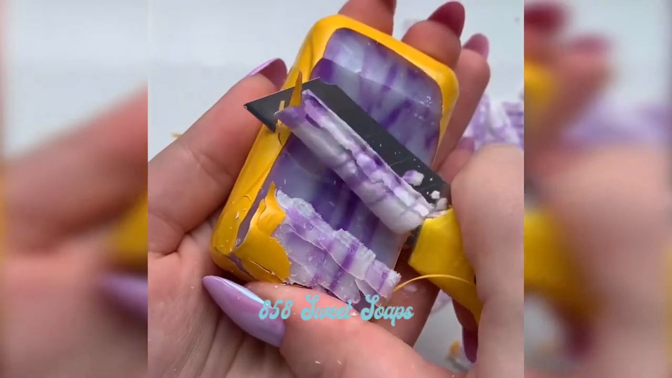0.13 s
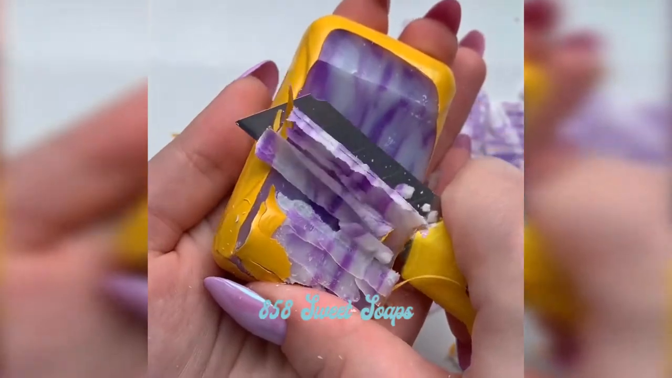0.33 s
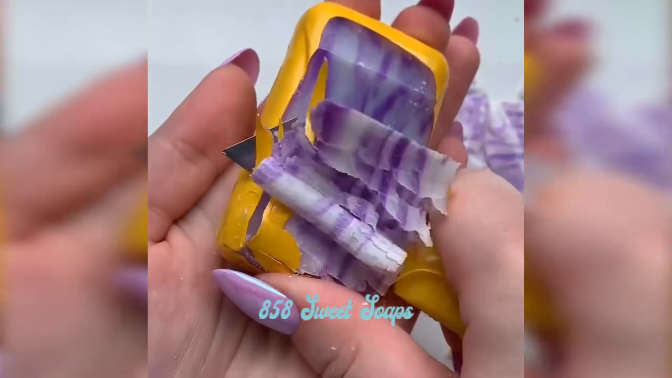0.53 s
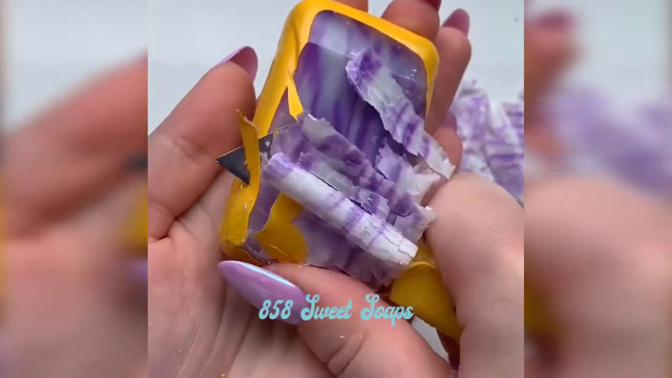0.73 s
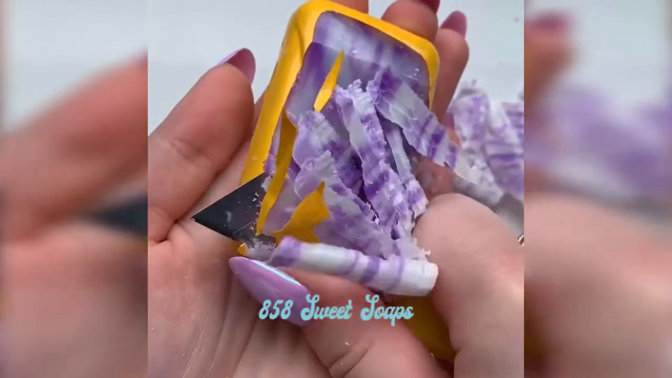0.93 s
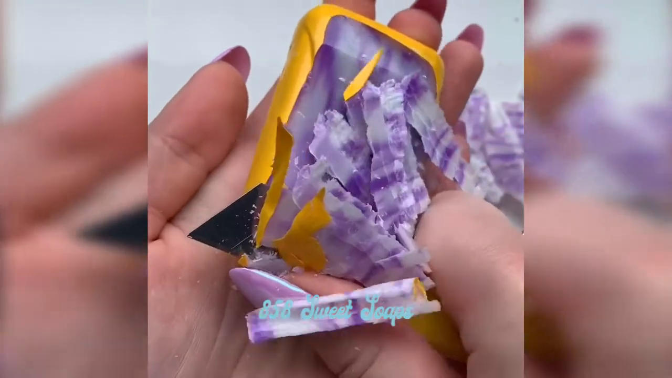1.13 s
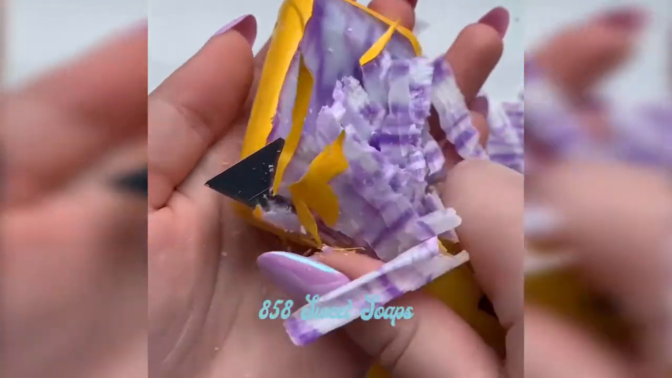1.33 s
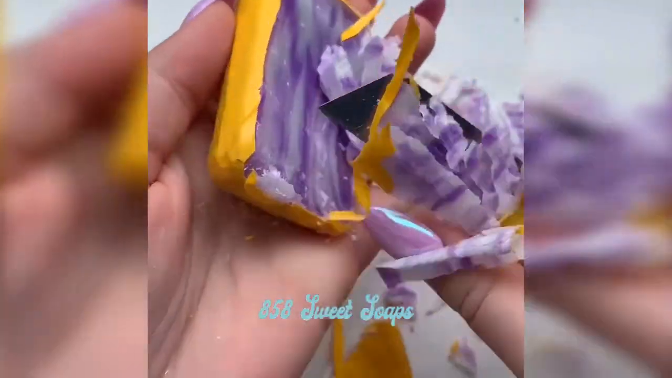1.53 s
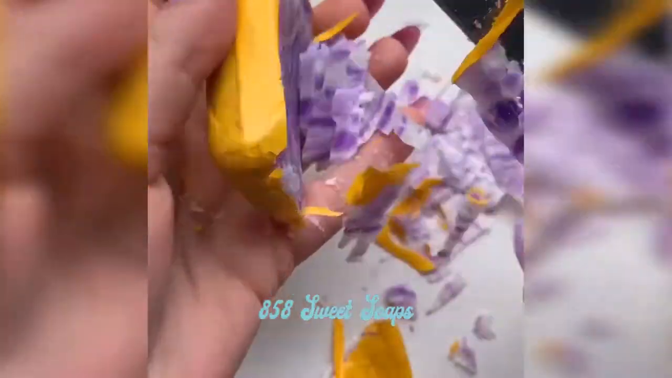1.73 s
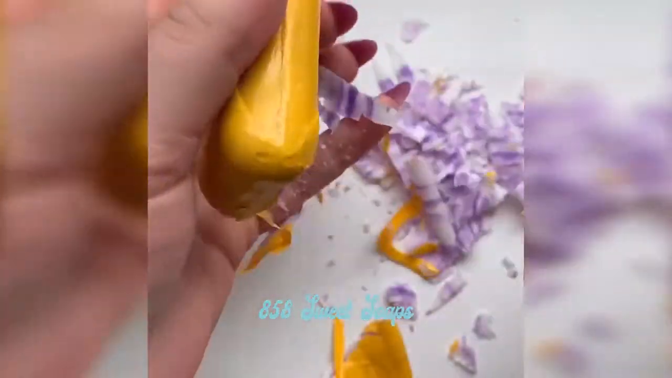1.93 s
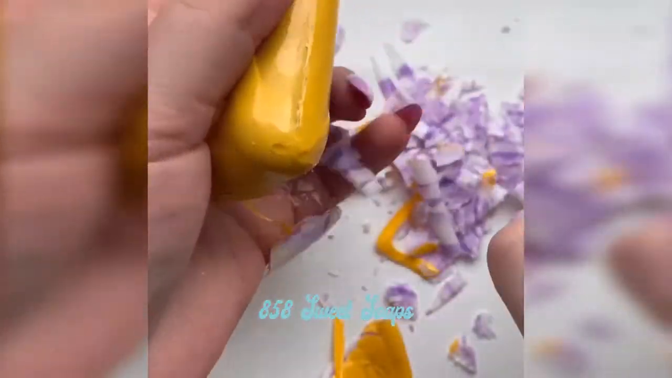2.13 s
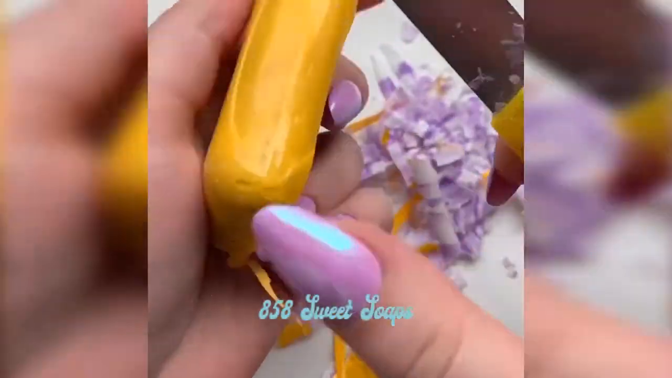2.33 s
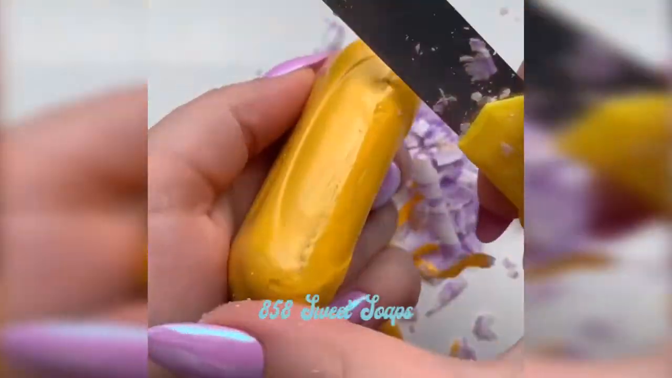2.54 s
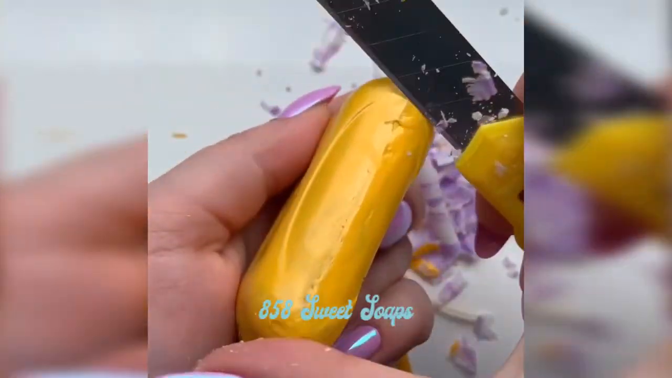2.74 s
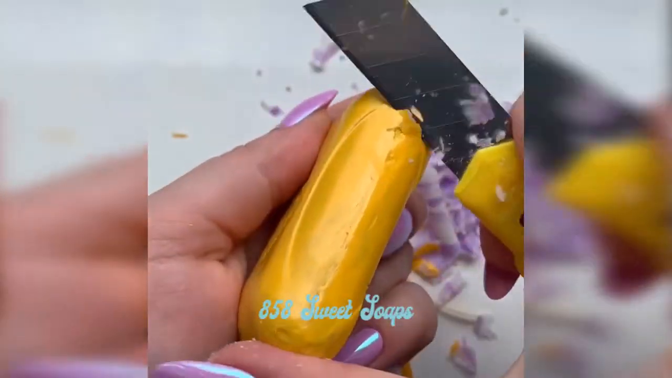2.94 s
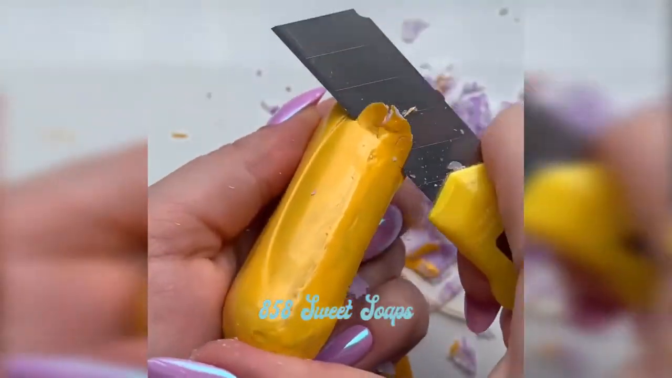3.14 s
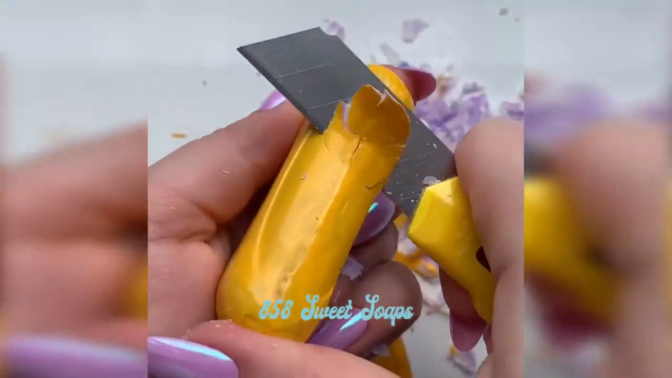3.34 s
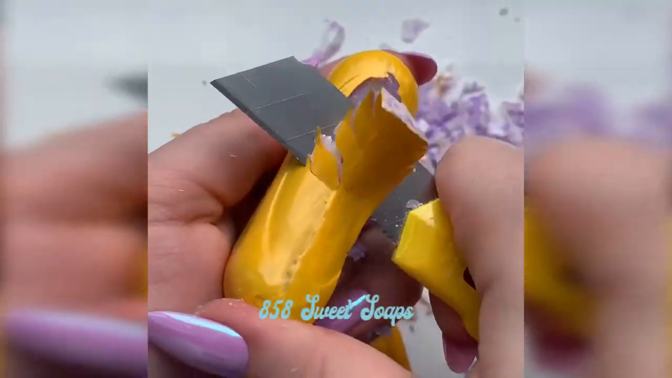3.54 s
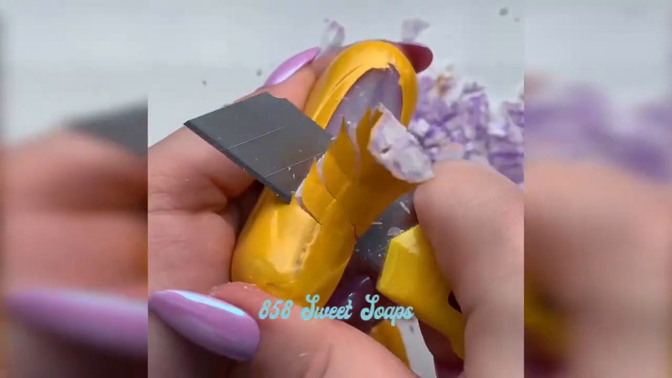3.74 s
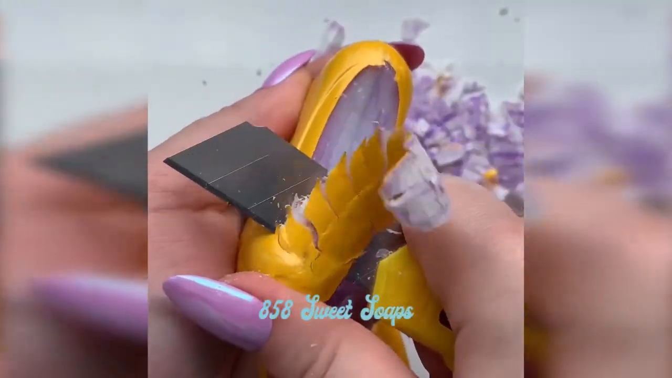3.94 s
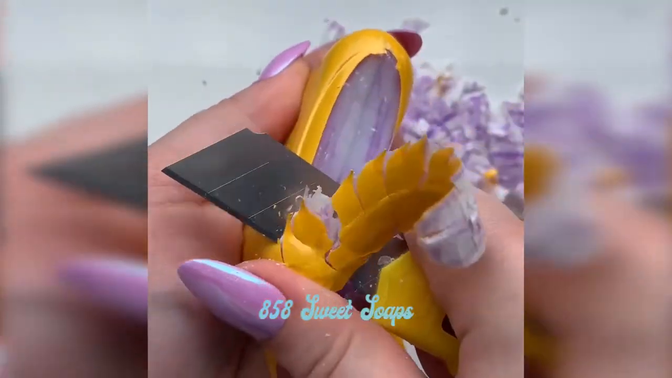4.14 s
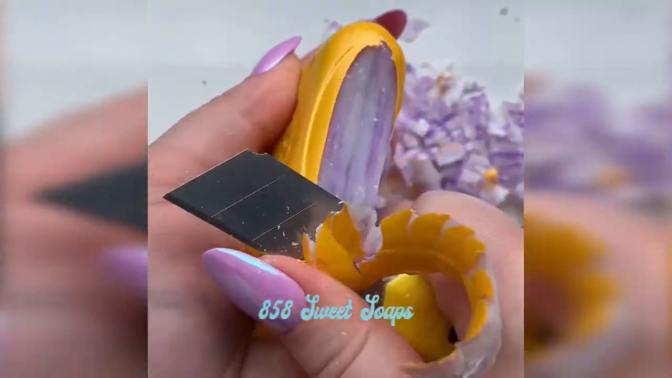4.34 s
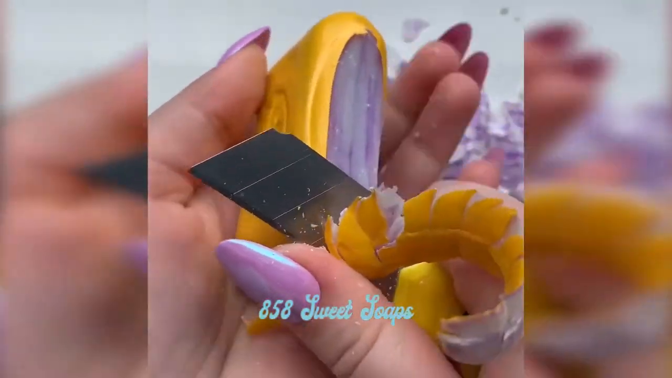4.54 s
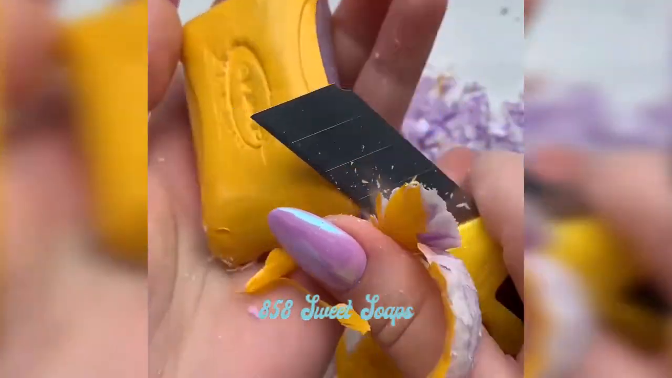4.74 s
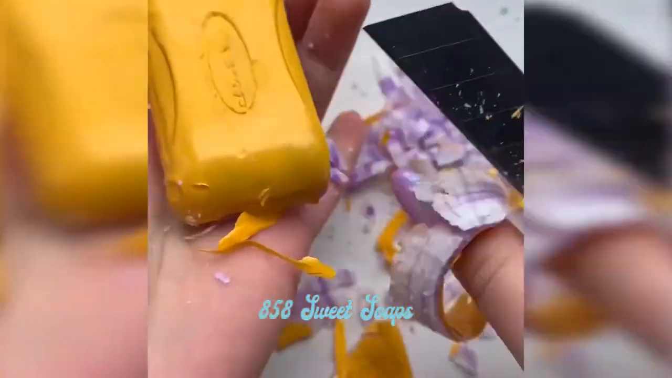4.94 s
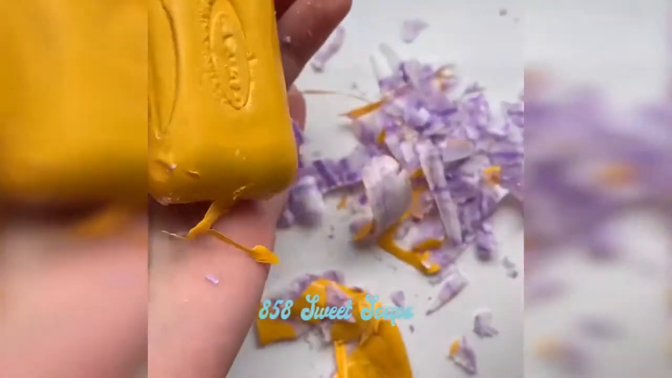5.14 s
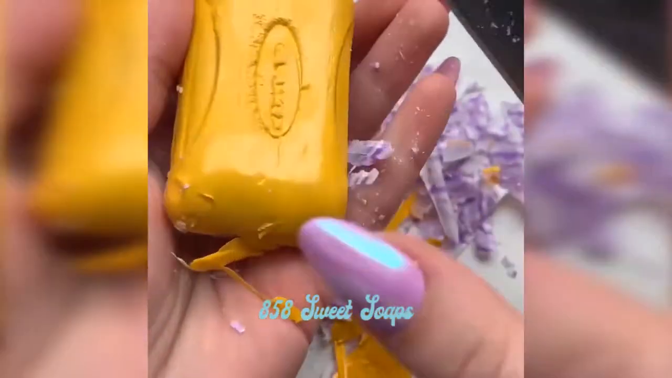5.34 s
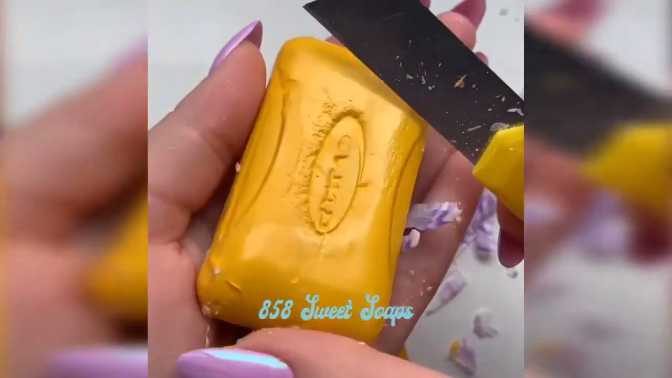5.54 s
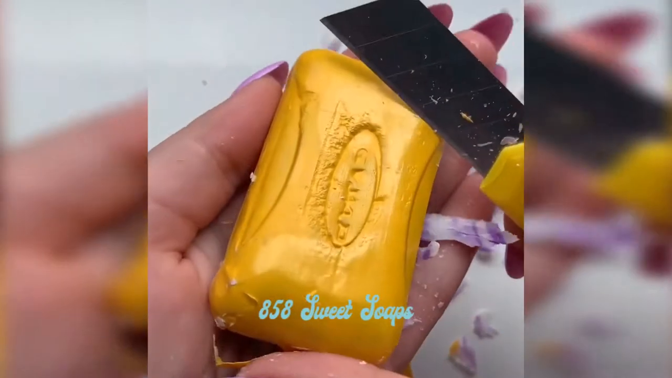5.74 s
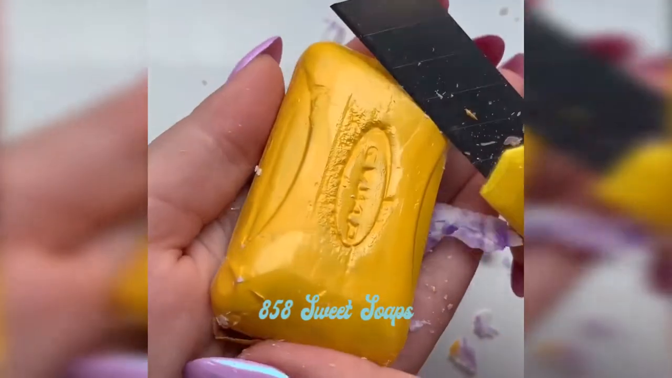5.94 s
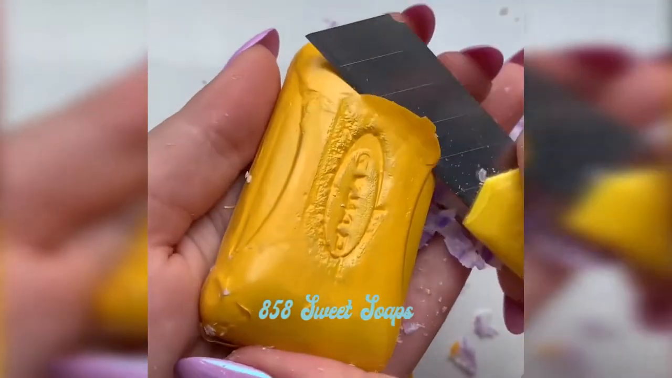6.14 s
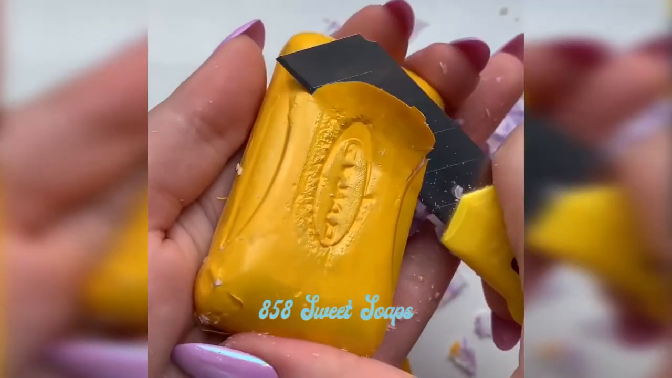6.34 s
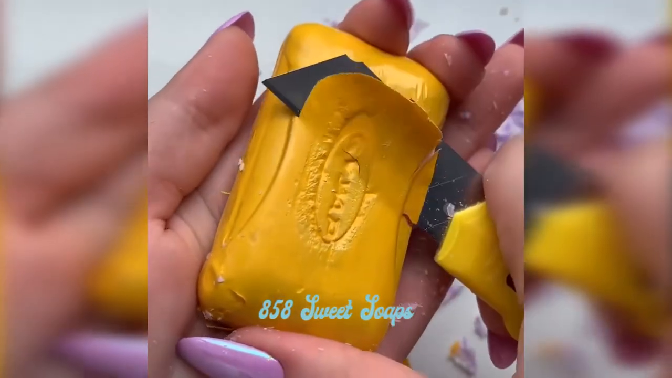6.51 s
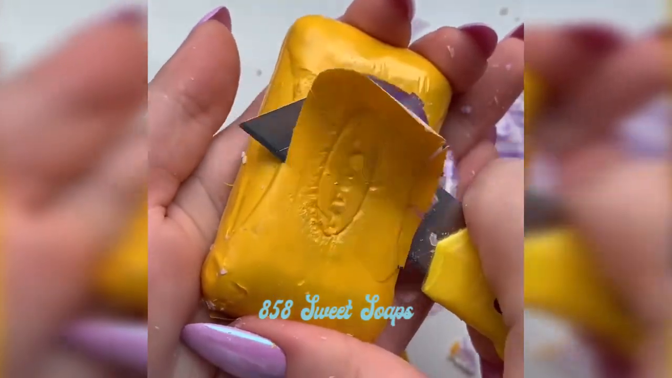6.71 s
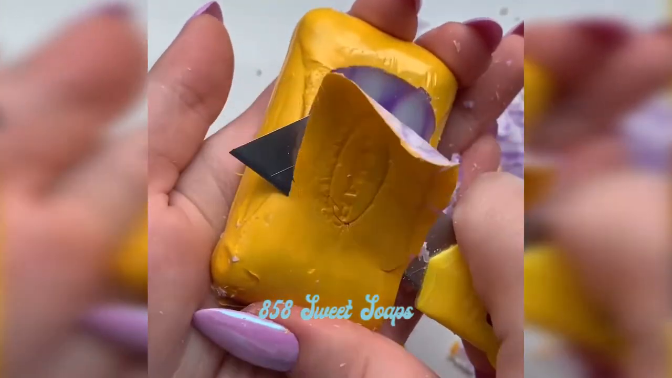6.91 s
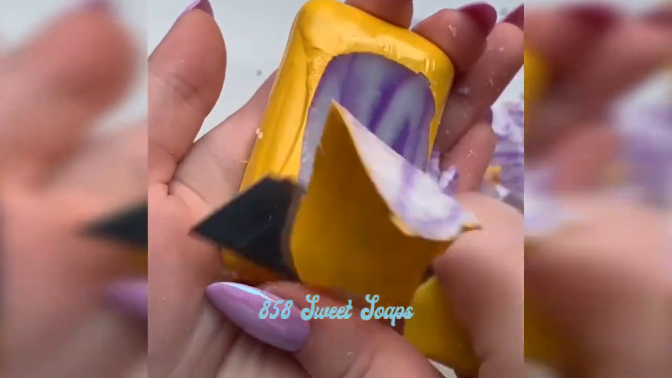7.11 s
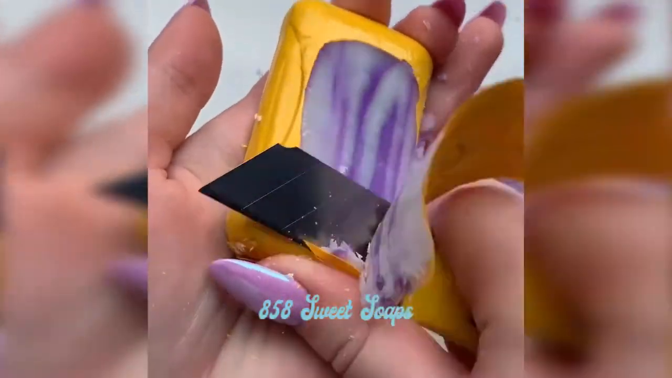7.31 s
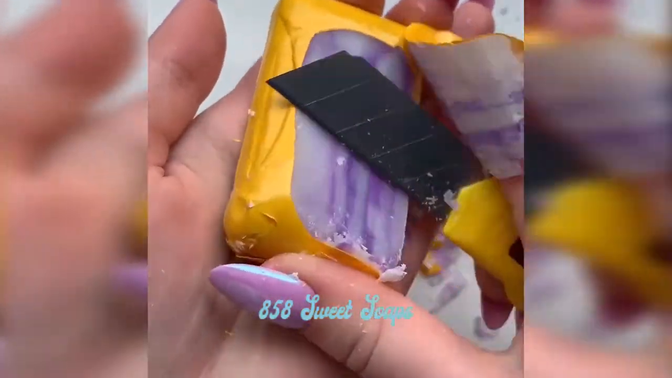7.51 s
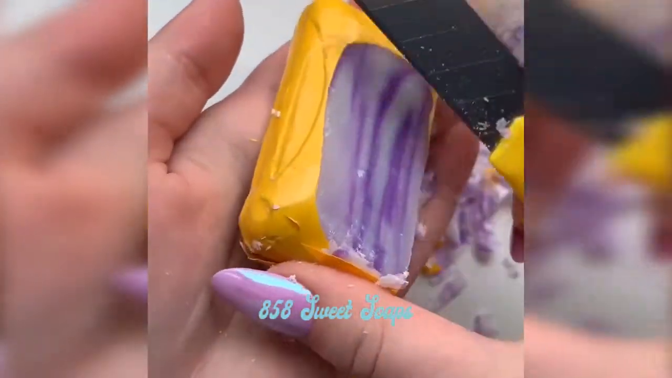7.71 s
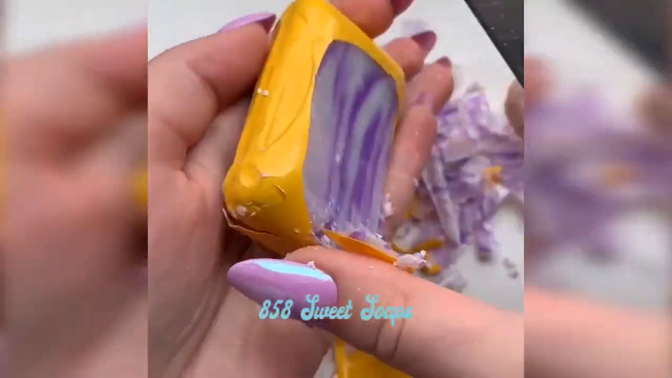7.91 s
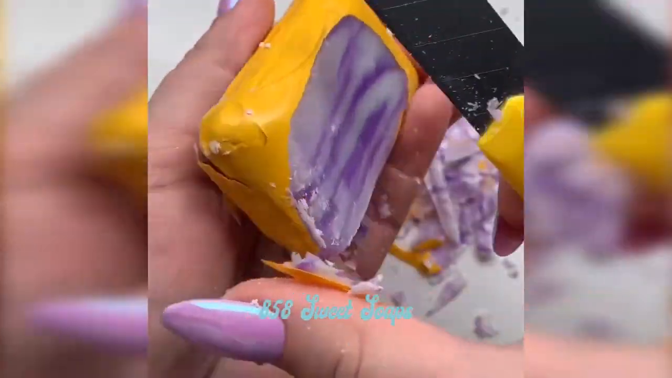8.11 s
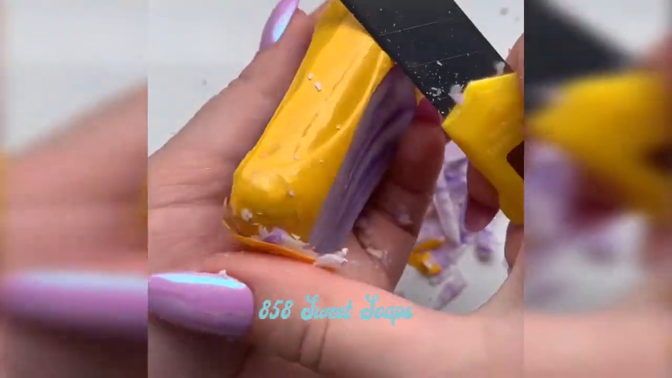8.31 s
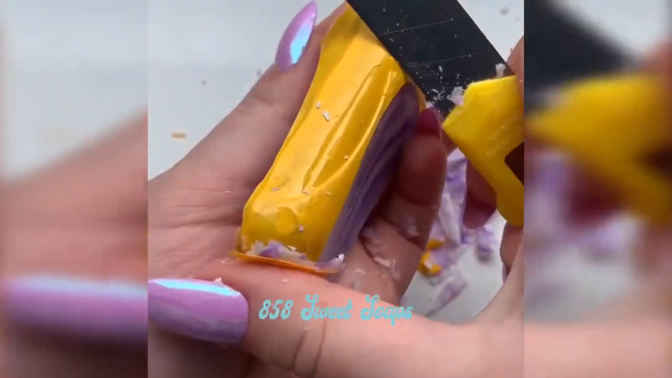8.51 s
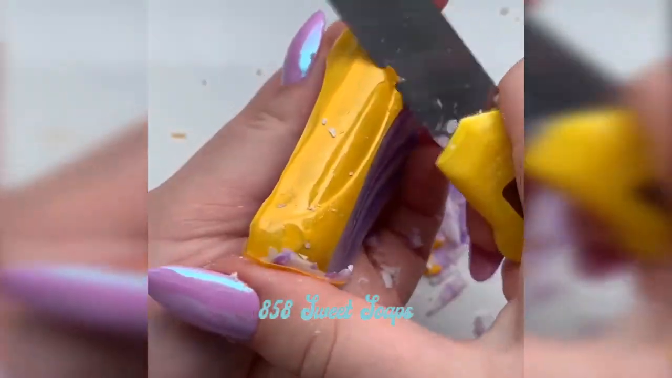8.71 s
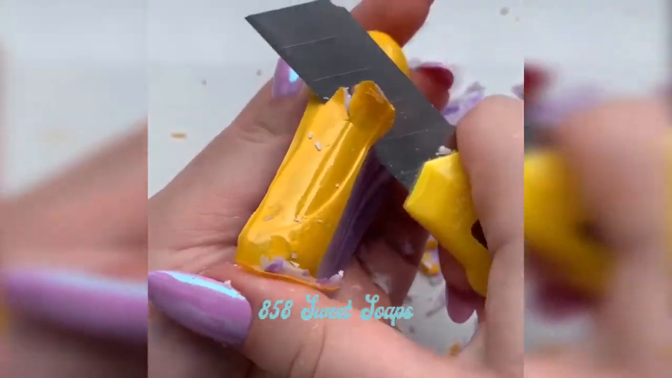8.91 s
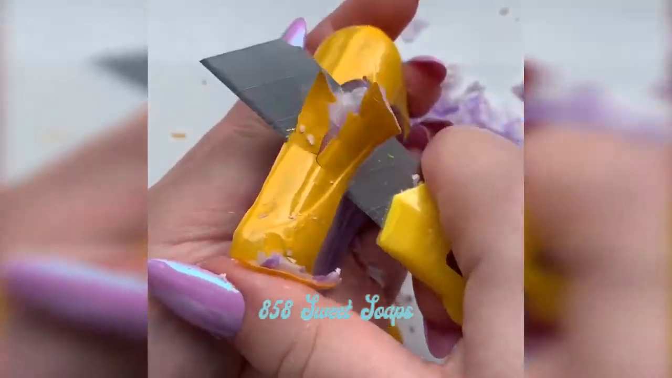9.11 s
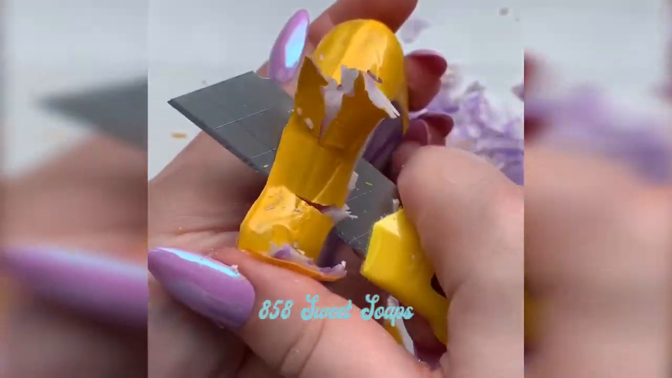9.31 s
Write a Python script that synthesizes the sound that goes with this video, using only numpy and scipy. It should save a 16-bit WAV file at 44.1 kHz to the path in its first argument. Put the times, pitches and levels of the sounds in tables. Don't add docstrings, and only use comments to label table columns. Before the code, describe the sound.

Very close stereo sound of a blade cutting dry soap in a quiet room. Faint flakes tick first, then a crunchy cluster of snaps and pieces tumbling onto a table. A hard crack, more brittle clicks, a lull with soft drops, then a wide slice splits in loud, dense snaps, and a last edge breaks sharply. Low hum and soft hiss underneath.

```python
import sys
import numpy as np
from scipy import signal
from scipy.fft import rfft, irfft
from scipy.io import wavfile
from scipy.ndimage import uniform_filter1d, map_coordinates

SR = 44100
rng = np.random.default_rng(int(sys.argv[2]) if len(sys.argv) > 2 else 0)


def store_wav(level_fs):
    pcm = np.round(np.clip(np.atleast_2d(level_fs), -1, 1) * 32767)
    wavfile.write(sys.argv[1], SR, pcm.T.astype(np.int16))


def volts(x):
    e = np.asarray(x, float) / 20
    return 10 ** e


N = 412776

# start_s, snap_db,
# ring_db
TICKS = [(.438, -44, -46), (1.09, -37, -40), (1.1774, -20, -26), (1.2172, -32, -65), (1.317, -17.5, -28.5),
         (1.3353, -26.5, -31), (1.3836, -8.5, -18), (1.792, -32, -30), (1.9669, -21, -28),
         (2.711, -42, -46), (3.4057, -17, -48), (3.596, -21, -32), (3.6281, -28, -53), (3.6642, -10.5, -55),
         (3.8371, -29.5, -47), (3.9181, -28, -77), (4.007, -15, -42.5), (4.0191, -6, -32),
         (4.0618, -21, -66), (4.3224, -31, -37), (4.746, -22.5, -30), (4.982, -32.5, -32),
         (6.2815, -23, -47.5), (6.3046, -23.5, -32), (6.451, -35.5, -70.5), (6.567, -12, -32),
               (6.8072, -8, -22), (6.8363, -13.5, -42), (6.8767, -24, -44), (6.8825, -39, -27),
               (6.9367, -15.5, -34), (6.952, -17.5, -26), (7.8275, -58, -40.5), (8.842, -20, -42),
               (8.9244, -25, -60), (8.961, -31, -57.5), (9.0615, -6.5, -22.5), (9.0813, -28, -65),
               (9.1096, -35.5, -38), (9.2771, -16, -41),
         (0.1524, -43.5, -51), (0.2448, -39, -43), (0.472, -39, -64), (0.5623, -34, -43),
          (0.6926, -27.5, -36), (0.7765, -41.5, -49), (0.8407, -28.5, -58), (0.8494, -36.5, -46),
          (0.9238, -49.5, -45), (1.0128, -33, -39.5), (1.3585, -35.5, -51), (1.3888, -7.5, -28.5),
          (1.4513, -33.5, -42), (1.4721, -34.5, -61), (1.608, -38.5, -71), (1.6328, -40.5, -54),
          (1.7549, -45.5, -62), (1.8772, -30, -50.5), (2.086, -20.5, -48.5), (2.1116, -39.5, -52),
          (2.1263, -39, -53), (2.4079, -50, -45.5), (2.8903, -44.5, -51), (3.149, -36, -49.5),
          (3.159, -32, -53.5), (3.179, -40, -61), (3.4948, -43, -62), (3.5027, -25.5, -58.5),
          (3.5139, -34, -53), (3.5182, -27, -55), (3.624, -37.5, -62), (3.7723, -31, -30),
          (3.789, -19, -65), (3.8324, -37, -62), (3.859, -26.5, -47),
         (4.0293, -26.5, -29.5), (4.258, -35, -49), (4.2799, -32, -61), (4.6103, -44, -46.5),
                (4.7615, -28, -45), (4.7731, -36, -48), (4.8025, -40, -64), (4.84, -33, -75),
                (4.947, -47, -37), (4.9928, -40, -61), (5.0034, -40, -69), (5.1218, -30.5, -53),
                (5.16, -29, -41), (5.6742, -31, -33), (5.8036, -38.5, -62.5), (5.9733, -40, -66),
                (6.0209, -49, -40), (6.1487, -32, -35), (6.1986, -26.5, -45), (6.2304, -35.5, -51),
                (6.2387, -35, -55), (6.3203, -29.5, -50), (6.3995, -43, -57.5), (6.5635, -25, -43),
                (6.682, -31.5, -57), (6.8682, -40.5, -53), (7.2733, -19.5, -44), (7.3011, -31.5, -51),
                (7.4141, -34, -28), (7.5267, -28.5, -38.5), (7.5399, -45.5, -54), (7.7037, -46, -47),
                (8.4162, -37.5, -21), (8.4833, -40.5, -55.5), (9.0867, -37, -45), (9.1334, -29, -44),
                (9.1617, -29, -53)]
# start_s, snap_db, ring_db,
# length_ms
SPLITS = [(0.0697, -54.5, -57, 6.1), (0.2044, -39.5, -46.5, 6.63), (0.5381, -32, -38.5, 6.4),
          (0.7023, -44.5, -47.5, 7.4), (0.7437, -39.5, -34.5, 3.1), (0.8203, -24, -33, 3.8),
          (0.8714, -25.5, -32.5, 1.9), (0.9599, -37, -39, 7.8), (1.2332, -28.5, -37, 2.7),
          (1.3668, -17, -32, 2), (1.3885, -17.5, -29, 2.15), (1.6404, -42.5, -39.5, 3.4),
          (2.866, -63.5, -34.5, 2.9), (3.262, -42.5, -56, 8.1), (3.4169, -16.5, -36, 1.9),
          (3.532, -35, -39.5, 5.4), (3.7882, -20.5, -55, 1.2), (4.2373, -34.5, -43, 5.2),
          (4.2552, -36.5, -44, 2.8), (4.3028, -42.5, -43, 6.3), (4.7545, -23.5, -34.5, 2.5),
          (4.8549, -57, -50, 6.8), (4.8902, -48, -37.5, 4.2), (5.0438, -32.5, -31.5, 4.9),
          (5.1308, -34.5, -65, 5.9),
          (6.2029, -33, -34, 4.1), (6.316, -8, -36, 0.8), (6.364, -29, -33.5, 4.5),
                (6.4977, -31.5, -34.5, 2.8), (6.5021, -5.5, -24, 1.9), (6.5391, -5.5, -21.5, 1.8),
                (6.5738, -26.5, -39.5, 2.1), (6.6469, -27, -39, 2.5), (6.6985, -44.5, -52.5, 5.1),
                (6.711, -38, -51, 4.7), (7.0718, -17, -40, 1.2), (7.2252, -13, -25.5, 1.4),
                (7.2661, -32, -51.5, 1.85), (7.38, -22.5, -26.5, 3.6), (9.0569, -31.5, -46, 4),
                (9.305, -4, -19, 1)]
# start_s, snap_db, ring_db,
# length_ms, knock_db
BREAKS = [(0.4924, -36.5, -40, 7.24, -54.5), (.972, -30.5, -38.5, 4.4, -48), (0.9823, -25.5, -37, 4.5, -45),
          (1.408, -23.5, -26.5, 2.5, -50), (1.663, -60, -36, 5.3, -52), (1.696, -66.5, -40.5, 3, -38),
          (1.8677, -38.5, -33.5, 4.7, -44), (2.0055, -59, -60, 9.1, -60), (2.076, -28.5, -48, 2.4, -51),
          (2.0865, -42, -33.5, 3.1, -35.5), (2.144, -50.5, -27, 1.7, -51), (2.24, -59, -66, 3.3, -47),
          (2.2861, -66.5, -34.5, 2.4, -54), (2.3473, -69, -49, 5.8, -57), (2.398, -44.5, -50, 4.1, -52),
          (2.7814, -35.5, -27, 5.24, -50.5), (2.7896, -35, -18, 1.7, -35), (2.8775, -38.5, -25, 3.5, -44.5),
          (3.040, -13, -13, 5.63, -26), (3.4593, -34, -43, 5.8, -56.5), (3.6738, -21, -31.5, 2.34, -66),
          (3.7026, -35, -48, 3.7, -54), (3.754, -16.5, -36.5, 1.4, -48), (3.869, -19, -33, 2.6, -60),
          (5.1428, -59, -48, 5.5, -40.5), (5.1703, -32, -28, 3.1, -38),
                (5.6592, -19.5, -18, 5.3, -34), (6.1086, -8.5, -15.5, 4.1, -26.5),
                (6.5783, -3.5, -42, 0.77, -44), (6.7892, -15, -28, 3, -59), (6.8301, -42, -36, 4.9, -55),
                (7.164, -14, -26, 2, -59), (7.175, -38, -17.5, 1.3, -39), (7.192, -14, -21, 2.6, -34),
                (7.2164, -8.5, -22, 4.1, -42), (7.232, -11, -20, 2.4, -38), (7.391, -24, -22.5, 3.4, -39),
                (7.6065, -43.5, -28.5, 3.6, -47.5), (8.012, -21.5, -22, 5.5, -27),
                (8.4106, -23.5, -17, 2.9, -35.5), (8.6618, -48, -26, 3.2, -45.5),
                (8.7399, -30.5, -29.5, 5.3, -38.5), (8.8156, -6.5, -11, 3.8, -20),
                (9.1326, -31.5, -37, 6.1, -49.5), (9.1385, -14.5, -27, 2.4, -41)]
TICK_MS, TICK_KNOCK_DB, SPLIT_KNOCK_DB = 1.347, -21, -18.5
# start_s, snap_db, ring_db, length_ms, knock_db
FRACTURES = [(s, snap, ring, TICK_MS, ring + TICK_KNOCK_DB)
             for s, snap, ring in TICKS]
FRACTURES += [(*row, row[2] + SPLIT_KNOCK_DB) for row in SPLITS]
FRACTURES += BREAKS

# start_s, length_s, fizz_db, ring_db
TEARING = [(0, 0.185, -60.5, -54), (0.47, 0.032, -41, -41), (0.679, 0.082, -67, -53),
           (0.829, 0.059, -44, -40.5), (0.962, 0.069, -47.5, -32.5), (1.169, 0.089, -63.5, -45.5),
           (1.351, 0.12, -50, -36.5), (1.619, 0.16, -57, -39.5), (1.78, 0.27, -61.5, -44),
           (1.93, 0.056, -38.5, -35.5), (2.878, 0.14, -67, -50.5), (3.398, 0.067, -52.5, -36),
           (3.505, 0.029, -36.5, -49), (3.583, 0.03, -36, -39.5), (3.761, 0.035, -45, -33),
           (4.235, 0.05, -56, -35.5), (4.569, .04, -62, -45.5), (4.756, 0.33, -78, -51.5),
           (6.304, 0.12, -50, -38.5), (6.544, 0.074, -54.5, -39), (6.631, 0.087, -63.5, -44.5),
           (7.159, 0.02, -19.5, -22), (7.273, 0.043, -40.5, -59), (7.48, 0.088, -43, -32),
           (7.75, 0.034, -56.5, -49.5), (8.9, 0.045, -40.5, -48), (9.276, 0.043, -43, -32)]
# start_s, length_s, ring_db, knock_db
TUMBLING = [(2.072, 0.135, -40.5, -44.5), (2.229, 0.11, -51, -45.5), (2.28, 0.047, -42.5, -46.5),
            (2.318, 0.088, -47.5, -46), (2.397, 0.076, -47, -44.5), (3.658, 0.054, -35.5, -53),
            (3.863, 0.029, -32.5, -40), (5.042, 0.027, -27, -64), (5.117, 0.13, -40, -43),
            (5.302, .071, -49.5, -54.5), (6.785, 0.057, -27.5, -47.5), (7.209, 0.035, -13, -31.5),
            (7.563, 0.077, -42, -50), (8.003, 0.12, -35.5, -33.5), (8.399, 0.071, -23, -40.5)]
TEAR_KNOCK_DB, TUMBLE_FIZZ_DB = -15.5, -17
# start_s, length_s, fizz_db, ring_db, knock_db
RUSTLES = [(*row, row[3] + TEAR_KNOCK_DB) for row in TEARING]
RUSTLES += [(s, length, ring + TUMBLE_FIZZ_DB, ring, knock) for s, length, ring, knock in TUMBLING]

# frequency_hz, level_db
SNAP_COLOUR = [(1200, -50.5), (3000, -27.5), (5500, -3), (7000, -4), (10500, 0.5), (12500, -3),
               (15400, -6.5)]
# frequency_hz, width_hz, level_db
RING_MODES = [(1768, 210, -7.5), (2290, 340, -7), (2805, 630, -7.5), (3200, 400, -9.5), (3890, 1010, -3.5),
              (4380, 540, -9.5), (5334, 920, -2)]
# frequency_hz, width_hz, level_db
KNOCK_MODES = [(261, 170, 2), (513, 240, -3.5), (751, 190, -8), (967, 290, -4.5), (1180, 590, -5)]
# time_s, pitch_hz
RING_PITCH = [(0, 3830), (1.32, 3740), (1.39, 2940), (1.7, 2200), (1.9, 3970), (2.1, 2070), (2.8, 2400),
              (2.9, 4300), (3.04, 3000), (3.67, 2974), (4.1, 4410), (5.05, 3285), (6.1, 3200), (6.55, 4640),
              (7.2, 3530), (7.6, 2220), (8, 3740), (8.4, 2550), (9.1, 2260), (9.3, 3470)]
# time_s, pitch_hz
KNOCK_PITCH = [(.5, 330), (1, 825), (2.2, 840), (3.04, 695), (3.7, 600), (5.14, 454), (5.3, 900),
               (6.1, 514), (7.2, 800), (8, 1150), (8.4, 1000), (8.8, 736), (9.2, 600)]
# frequency_hz, left_minus_right_db
PORT_LEAN = [(300, -2.5), (1000, 2.5), (2300, 1.5), (4000, -0.5)]
PORT_LAG_S = 0.0002575

# peak_s, level_db, pitch_hz
PINGS = [(0.541, -32.5, 1670), (0.7453, -34, 2890), (0.8215, -30.5, 1740), (1.388, -25, 2240),
         (1.412, -34, 2207), (1.697, -38, 1200), (2.0893, -34.5, 2610), (2.7827, -21, 3380),
         (2.7839, -36, 2370), (2.879, -23.5, 4010), (3.0412, -14.5, 3570), (3.042, -12.5, 2257),
         (3.6769, -33, 1796), (4.592, -45, 2080), (4.613, -53, 2270), (4.764, -46.5, 1170),
         (4.894, -37, 2550), (5.66, -22.5, 4030), (5.6621, -23, 1800), (5.6626, -15, 3370),
         (6.1118, -13.5, 4230), (6.1102, -13, 2304), (7.396, -33, 2290), (7.608, -34.5, 1930),
         (7.779, -48, 2200), (7.829, -45, 2260), (8.016, -19.5, 1190), (8.4154, -29, 1780),
         (8.434, -32.5, 2290), (8.663, -36, 2255), (8.8197, -13.5, 3226), (8.8192, -13, 2690),
         (8.818, -13, 4310), (8.8197, -12.5, 2280), (9.1408, -32.5, 2250)]
PING_RISE_S, PING_T60_S = 0.0014, 0.024
PING_LEAD_S = 0.00008
# start_s, level_db, pitch_hz
CHIMES = [
    (2.787, -44, 1116),
    (7.608, -55, 5920),
]
# start_s, level_db, pitch_hz
DROPS = [(0.492, -40, 380), (2.005, -31, 851), (2.02, -41, 740), (2.086, -32, 597), (2.1, -31.5, 726),
         (2.14, -34.5, 730), (2.159, -38, 740), (2.237, -42, 730), (2.283, -30.5, 990), (2.303, -33, 751),
         (2.319, -38, 940), (2.326, -36, 740), (2.346, -31.5, 860), (2.396, -33, 309), (2.432, -35, 920),
         (5.14, -25.5, 470), (5.151, -29.5, 496), (5.162, -30, 500), (5.175, -34, 510), (5.188, -38, 930),
         (5.201, -44, 800), (5.303, -51, 864), (5.32, -43.5, 960), (8.014, -19, 740), (8.064, -31, 1200)]
# frequency_hz, level_db, t60_s
TABLE_MODES = [(496, -15, 0.14), (740, -14, 0.16), (940, -17, 0.11)]
TAP_T60_S, TAP_DB = 0.019, 0
# start_s, level_db, pitch_hz
BUMPS = [(0.209, -46, 60), (0.486, -36, 54.4), (0.973, -49, 98), (3.038, -32.5, 177.4), (3.041, -39, 72),
         (3.533, -47, 69.3), (3.868, -50.5, 79), (3.59, -45, 52), (3.672, -45.5, 110), (4.234, -45.5, 77.4),
         (6.101, -39.5, 83), (6.106, -40.5, 187), (6.801, -44, 87.6), (7.204, -40.5, 50), (7.471, -48, 92),
         (8.008, -42.5, 205), (8.814, -39, 61.5), (9.136, -48, 86.5)]

# frequency_hz, t60_s
ROOM_T60 = [(200, 0.18), (3000, 0.43), (8000, 0.18), (16000, 0.19)]
# frequency_hz, likeness_0_to_1
LIKENESS = [(60, 0.15), (300, 1), (700, 0.14), (1500, 0.042), (6000, 0.047), (8500, 1)]
# frequency_hz, density_db_per_hz
AIR = [(15, -30.5), (25, -7), (110, 9.5), (537, -6.5), (3170, -15), (6920, -23), (7910, -24), (9050, -13.5),
       (11500, -24), (13200, -19.5), (15500, -35)]
AIR_DB = -61.5


def evened(x):
    return x / np.sqrt(np.mean(x ** 2) + 1e-20)


def read(points, hz):
    f, value = np.transpose(points)
    return np.interp(np.log(hz + 1), np.log(f + 1), value)


def add(mix, s, sound):
    part = mix[..., max(round(s * SR), 0):][..., :sound.shape[-1]]
    part += sound[..., :part.shape[-1]]


def mode(x, hz, width):
    x = signal.lfilter(*signal.iirpeak(hz, hz / width, SR), x)
    x = signal.lfilter(*signal.iirpeak(hz, hz / (4 * width), SR), x)
    return x / np.sqrt(np.pi * width / SR)


def detuning_db(hz, pitch_hz, slope, floor):
    return -np.minimum(slope * np.log2(hz / pitch_hz) ** 2, floor)


def soap():
    snaps, stray, drives = fractures()
    fizz, ring, knock = crumbling()
    out = bright(snaps + fizz * crackle(4000, 4), stray + fizz * crackle(5000, 3.0))
    shared, apart = crackle(2500, 3.5), crackle(2500, 3.5)
    crumbs = np.array([shared, .7 * shared + .4 * apart])
    t = np.arange(N) / SR
    grip_hz = np.interp(t, *np.transpose(KNOCK_PITCH))
    blade_hz = np.interp(t, *np.transpose(RING_PITCH))
    curled = np.arange(N) < 1.15 * SR
    for k, (hz, width, db) in enumerate(RING_MODES + KNOCK_MODES):
        if k < len(RING_MODES):
            rub = volts(-12.5) * ring * volts(detuning_db(hz, blade_hz, 4.1, 10))
        else:
            rub = volts(-5.5) * knock * volts(detuning_db(hz, grip_hz, 1.6, 12))
        rub = rub * np.roll(crumbs, 997 * k, axis=1)
        lean = read(PORT_LEAN, hz) / 2
        curl = volts(11.0 * curled * (k in (0, 5)))
        out += volts([[db + lean], [db - lean]]) * mode(curl * (drives[:, k] + rub), hz, width)
    return out


def fractures():
    t = np.arange(2000) / SR - .022
    ring_hz, knock_hz = np.transpose(RING_MODES)[0], np.transpose(KNOCK_MODES)[0]
    count, modes = len(FRACTURES), len(RING_MODES + KNOCK_MODES)
    snaps, stray, drives = np.zeros(N), np.zeros(N), np.zeros((2, modes, N))
    noise = rng.standard_normal((count, 4, len(t)))
    patches = uniform_filter1d(rng.standard_normal((count, 1, len(t) // 2 + 1)), size=12)
    tilt = [[[.17 * (snap - ring - 10)]] for _, snap, ring, *_ in FRACTURES]
    tilt = np.clip(tilt, -1, 6.0)
    octaves = np.log2(np.fft.rfftfreq(len(t), 1 / SR) / 9000 + .2)
    colour = volts(1.3 * evened(patches) + tilt * octaves)
    noise[:, :2] = irfft(rfft(noise[:, :2]) * colour, len(t))
    noise /= np.sqrt(uniform_filter1d(noise ** 2, size=24))
    mix_db = 1.8 * rng.standard_normal((count, modes))
    for (s, snap_db, ring_db, ms, knock_db), (a, b, c, d), mix in zip(FRACTURES, noise, mix_db):
        length = max(ms - .9, .25) / 1000
        creep = .07 * ms * length + .0001
        front = np.exp(np.minimum(t / creep, -t / length))
        after = min(ms / 2.1, 1) * volts(-10.5 - 60 * t / 0.044) * (t > 0)
        creak = volts(-31.5 + 60 * t / 0.032) * (t < 0)
        stutter = np.exp(500 * length * uniform_filter1d(d, size=12))
        burst = (front + after + creak) * stutter
        add(snaps, s + t[0], volts(snap_db - 1.0) * burst * a)
        add(stray, s + t[0], volts(snap_db + 6) * burst * b)
        near_db = detuning_db(ring_hz, np.interp(s, *np.transpose(RING_PITCH)), 16, 12)
        grip_db = detuning_db(knock_hz, np.interp(s, *np.transpose(KNOCK_PITCH)), 5.3, 14)
        level_db = np.r_[ring_db + 1.5 + near_db, knock_db + 3.0 + grip_db]
        level = volts(level_db + mix)[:, None]
        add(drives[0], s + t[0] - .00007, level * burst * c)
        add(drives[1], s + t[0], level * burst * (.75 * c + .3 * b))
    return snaps, stray, drives


def bright(snaps, stray):
    colour = evened(volts(read(SNAP_COLOUR, np.fft.rfftfreq(N, 1 / SR))))
    left, right = irfft(rfft([snaps + stray / 7, snaps - stray / 7]) * colour, N)
    return ports(left, right, PORT_LAG_S)


def ports(left, right, lag_s):
    hz = np.fft.rfftfreq(len(left), 1 / SR)
    late = np.exp(-2j * np.pi * hz * lag_s)
    return np.array([irfft(rfft(left) * late, len(left)), right])


def crumbling():
    levels = np.zeros((3, N))
    for s, length, *db in RUSTLES:
        u = np.arange(0, 1.3, 1 / (length * SR))
        shape = np.minimum(u * length / .003, 1) * np.clip((1.3 - u) / .8, 0, 1)
        fade = volts(np.outer([-4.0, -5.0, -11.0], u))
        add(levels, s, volts(db)[:, None] * shape * fade)
    clumps = evened(uniform_filter1d(rng.standard_normal(N), size=260))
    return levels * volts(3.6 * clumps)


def crackle(per_s, spread_db):
    size = volts(spread_db * np.minimum(rng.exponential(1, N), 4)) * rng.standard_normal(N)
    return evened(size * (rng.random(N) < per_s / SR))


def pings():
    out, t = np.zeros((2, N)), np.arange(3000) / SR - .01
    rough = uniform_filter1d(rng.standard_normal((len(PINGS), 2, len(t))), size=60)
    lead = PING_LEAD_S * np.array([[1], [0]])
    for (s, db, hz), wobble in zip(PINGS, evened(rough)):
        swell_db = -4.3 * (t / PING_RISE_S) ** 2 * (t < 0)
        shape = volts(db + np.minimum(swell_db, -60 * t / PING_T60_S))
        swing = np.cos(2 * np.pi * hz * (t + lead) + .3 * wobble)
        add(out, s + t[0], volts([[2.0], [-2.0]]) * shape * swing)
    return out


def chimes():
    out, t = np.zeros((2, N)), np.arange(6000) / SR
    for s, db, hz in CHIMES:
        add(out, s, volts(db - 60 * t / 0.29) * np.outer([1, .5], np.sin(2 * np.pi * hz * t)))
    return out


def drops():
    out, t = np.zeros((2, N)), np.arange(6000) / SR
    for (s, db, hz), (a, b) in zip(DROPS, rng.standard_normal((len(DROPS), 2))):
        sound = volts(TAP_DB - 60 * t / TAP_T60_S) * np.sin(2 * np.pi * hz * t)
        for f, level, t60 in TABLE_MODES:
            decay = volts(level - 8.6 * np.log2(f / hz) ** 2 - 60 * t / t60)
            sound = sound + decay * np.sin(2 * np.pi * f * (1 + 0.015 * a) * t)
        sound = volts(db) * np.minimum(t / 0.0011, 1) * np.sign(b) * sound
        left = np.r_[np.zeros(4), sound[:-4]]
        add(out, s + .001, np.array([volts(1.5) * left, volts(-1.5) * sound]))
    return out


def bumps():
    out, t = np.zeros(N), np.arange(5000) / SR
    for s, db, hz in BUMPS:
        overtone = 1.2 * np.sin(2 * np.pi * 2.294 * hz * t) * volts(-60 * t / 0.071)
        swing = np.sin(2 * np.pi * hz * t) + overtone
        add(out, s, volts(db + 6.5 - 60 * t / 0.13) * np.minimum(t / 0.0053, 1) * swing)
    return out


def room(x):
    wander = signal.lfilter(*signal.butter(2, [60, 350], "band", fs=SR), rng.standard_normal(N))
    wander = 5 * np.tanh(evened(wander))
    x = [map_coordinates(port, [np.arange(N) + wander], order=3) for port in x]
    taps = rng.choice([-1., 1.], (2, SR // 2)) * (rng.random((2, SR // 2)) < .06)
    taps[:, :250] = 0
    hz, t, z = signal.stft(taps, SR, nperseg=256)
    same = np.clip(read(LIKENESS, hz), 0, 1)[:, None]
    z = np.array([z[0], same * z[0] + np.sqrt(1 - same ** 2) * z[1]])
    decay = volts(-60 * t / read(ROOM_T60, hz)[:, None])
    tail = signal.istft(z * decay, SR, nperseg=256)[1]
    return signal.fftconvolve(x, tail / np.linalg.norm(tail[0]), axes=1)[:, :N]


def air():
    frames, hz = N // 256 + 5, np.fft.rfftfreq(1024, 1 / SR)
    a, b, c, d, patches = rng.standard_normal((frames, 513, 5)).T
    patches = uniform_filter1d(patches, size=10, axis=0)
    patches = evened(uniform_filter1d(patches, size=14, axis=1))
    same = np.clip(read(LIKENESS, hz), 0, 1)[:, None]
    late = np.exp(-2j * np.pi * hz * PORT_LAG_S * (hz > 5000))[:, None]
    right = a + 1j * b
    left = late * (same * right + np.sqrt(1 - same ** 2) * (c + 1j * d))
    drift_db = np.clip(hz / 500, .5, 2.4)[:, None] * patches
    z = np.array([left, right]) * volts(read(AIR, hz)[:, None] + drift_db)
    return volts(AIR_DB) * evened(signal.istft(z, nperseg=1024, noverlap=768)[1][:, :N])


def hum():
    t = np.arange(N) / SR
    drone = evened(np.sin(2 * np.pi * 49 * t) + 0.95 * mode(rng.standard_normal(N), 49, 17))
    whine = np.zeros((2, N))
    for hz, share in ((3149, 1), (3838, .6)):
        tone = 1.5 * np.sin(2 * np.pi * hz * t)
        whine += share * (mode(rng.standard_normal((2, N)), hz, 9) + tone)
    return volts(-57.5) * drone + volts(-77.5) * evened(whine)


def scene():
    near = soap() + drops() + chimes() + pings()
    return near + volts(-18.0) * room(near) + bumps() + air() + hum()


def band_limit(x):
    return signal.sosfilt(signal.butter(12, 17010, fs=SR, output="sos"), x)


def record(dry):
    edge = signal.firwin(101, 16650, window=("kaiser", 8), fs=SR)
    clipped = np.clip(dry, -.97, .97)
    mix = signal.oaconvolve(clipped, edge[None], "same")
    return band_limit(mix)


dry = scene()
out = record(dry)
store_wav(out)
```